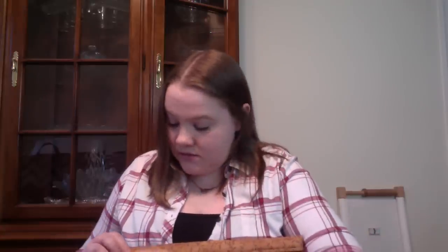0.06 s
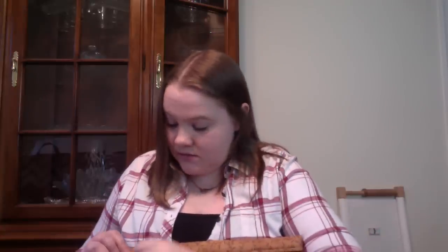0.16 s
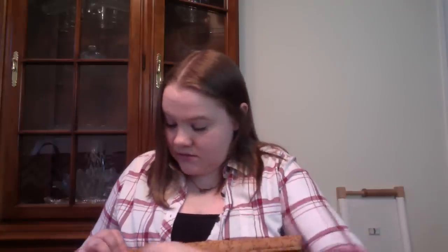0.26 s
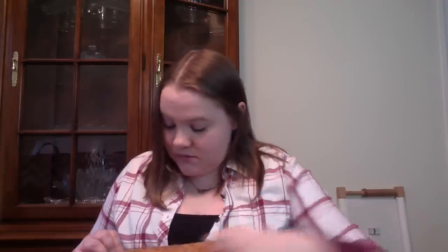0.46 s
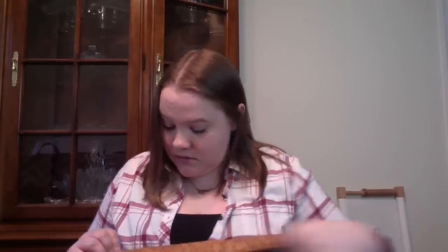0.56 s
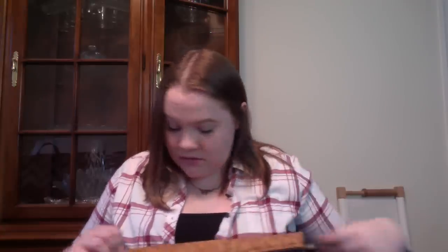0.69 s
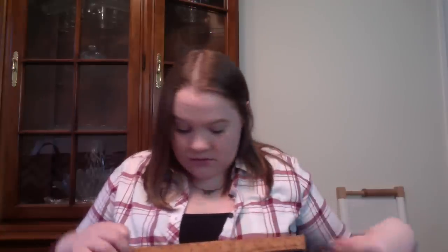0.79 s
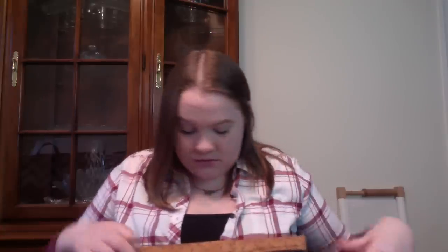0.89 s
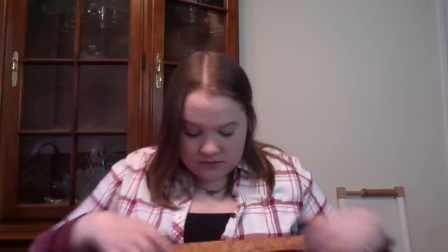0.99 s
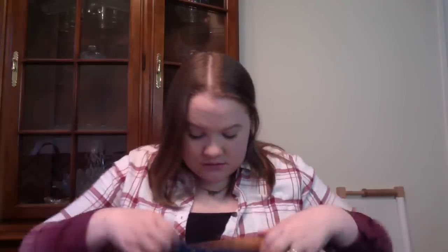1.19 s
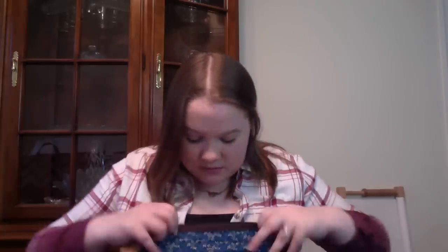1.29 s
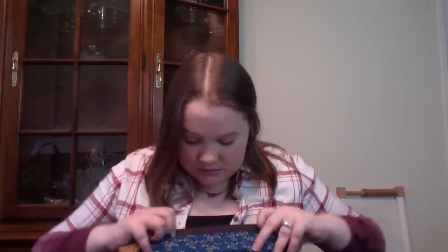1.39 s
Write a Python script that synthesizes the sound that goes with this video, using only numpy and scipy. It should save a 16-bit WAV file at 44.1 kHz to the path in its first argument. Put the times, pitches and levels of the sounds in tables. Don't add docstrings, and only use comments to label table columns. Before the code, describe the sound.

Faint tab clinks, then a single raspy zip that speeds up, brightens and slows to a stop, followed by light metal ticks and fabric rustling; indoors, close small microphone with slightly dull treble and low hiss.

```python
import sys
import numpy as np
from scipy import signal
from scipy.fft import rfft, irfft, next_fast_len
from scipy.io import wavfile
from scipy.ndimage import uniform_filter1d, map_coordinates

SR = 44100
rng = np.random.default_rng(int(sys.argv[2]) if len(sys.argv) > 2 else 0)


def ratio_of_db(decibels):
    return 10 ** (np.asarray(decibels, float) / 20)


def wrap_up_sound(samples):
    columns = np.atleast_2d(samples).T
    tamed = np.clip(columns, -1, 1)
    steps = np.round(tamed * 32767).astype(np.int16)
    wavfile.write(sys.argv[1], SR, steps)


N = 63945
T_S = np.arange(N) / SR


def unit(x):
    return x / np.sqrt(np.mean(x ** 2) + 1e-20)


def along(points, hz):
    point_hz, value = np.transpose(points)
    return np.interp(np.log(hz + 1), np.log(point_hz + 1), value)


def curves(rows):
    time_s, *columns = np.transpose(rows)
    return [np.interp(T_S, time_s, column) for column in columns]


def wobble(rate_hz):
    return map_coordinates(rng.standard_normal(400), [T_S * rate_hz])


def filtered(x, response):
    size = next_fast_len(N + SR // 2)
    spectrum = rfft(x, size) * response(np.fft.rfftfreq(size, 1 / SR))
    return irfft(spectrum, size)[..., :N]


def noise(level_db):
    return unit(filtered(rng.standard_normal(N), lambda hz: ratio_of_db(along(level_db, hz))))


def body(x, peaks, patchy_db=0, speed_db=0):
    steeper_hz = 5900
    center_hz, width_hz, level_db = np.transpose(peaks)[:, :, None]

    def resonances(hz):
        damping = 1j * hz * width_hz
        return ratio_of_db(level_db) * (damping / (center_hz ** 2 - hz ** 2 + damping)) ** 2

    parts = filtered(x, resonances)
    drift = np.array([ratio_of_db(patchy_db * wobble(25.04)) for peak in peaks]) if patchy_db else 1
    moved = parts * drift * ratio_of_db(speed_db * center_hz / steeper_hz)
    return moved.sum(axis=0) / np.std(parts.sum(axis=0))


def impulses(at, size):
    k = np.floor(at)[:, None] + np.arange(-7, 9)
    offset = k - at[:, None]
    taps = size[:, None] * np.sinc(offset) * np.cos(np.pi * offset / 16) ** 2
    return np.bincount(np.clip(k, 0, N).astype(int).ravel(), taps.ravel(), N + 1)[:N]


# hz, level_db
HUM_SPECTRUM = [(18, -56), (30, -40), (59, -47), (86, -7), (146, 2), (178, -4), (289, -3.5), (465, -19),
                (700, -23), (910, -53), (1540, -120)]


def air():
    rumble = noise(HUM_SPECTRUM) * ratio_of_db(-62.5 + 0.5 * wobble(8.1))
    mains = ratio_of_db(-79.5) * np.sin(2 * np.pi * 58 * T_S)
    hiss = ratio_of_db(-71.5) * noise([(300, -120), (500, 7.5), (9000, -12), (15500, 1)])
    return rumble + mains + hiss


# time_s, level_db
HANDLING = [(0, -65.5), (.11, -69.5), (.3, -54.5), (.72, -60.5), (.8, -64), (.95, -64.5), (1.03, -68),
            (1.13, -63.5), (1.17, -66.5), (1.21, -65.5), (1.28, -65), (1.34, -66), (1.45, -67)]
# hz, level_db
RUSTLE_SPECTRUM = [(240, -45), (400, -1), (760, 1.5), (821, -0.5), (1200, 1.5), (2150, -2.5), (4550, -6.5),
                   (8020, -15.5), (15500, -37)]


def cloth():
    strength_db, = curves(HANDLING)
    grains = rng.standard_normal(N) * ratio_of_db(2 * rng.standard_normal(N))
    rub = unit(filtered(grains, lambda hz: ratio_of_db(along(RUSTLE_SPECTRUM, hz))))
    return ratio_of_db(strength_db + 1.66 * wobble(23.05)) * rub


# start_s, peak_db, pitch_hz, own_db (share of that pitch)
TICKS = [(0.1479, -50, 3140, 8), (0.1738, -53, 2950, 20), (0.201, -50.5, 3230, 21), (0.7728, -49, 5150, -4),
         (0.8458, -52.5, 3220, -9), (0.857, -51, 4470, -11), (0.8817, -57.5, 2850, 4),
         (0.9156, -44, 3000, -25), (0.972, -49.5, 2830, -12), (1.033, -56.5, 3070, -7),
         (1.061, -53.5, 7640, 5.5), (1.1227, -54.5, 3850, -5), (1.1416, -49.5, 6500, -7)]
# center_hz, width_hz, level_db
TICK_BODY = [(1280, 450, -3.5), (3040, 1600, 1.5), (3950, 660, -1.5), (5020, 510, -11), (6860, 850, -2.5),
             (9540, 540, -6)]
# start_s, pitch_hz, level_db, t60_s
RINGS = [(.002, 3180, -62.5, 0.27), (0.787, 6810, -74, .5), (.813, 9100, -80, 0.33),
         (.846, 11800, -53.5, 0.039), (0.856, 11450, -60, .035), (0.921, 3260, -63, 0.22),
         (.94, 3130, -63.5, .3), (1.143, 6660, -55, 0.043), (0.984, 442, -63, 0.21),
         (0.673, 5570, -51, .06), (.686, 6630, -59, .12)]


def tab():
    tick_db, tick_t60_s, width_over_pitch = -1, .018, .2
    ring_width_hz, ring_attack_s = 35, 0.00067
    out = np.zeros(2 * N)
    for start_s, peak_db, pitch_hz, own_db in TICKS:
        burst = ratio_of_db(-60 * T_S / tick_t60_s) * rng.standard_normal(N)
        own = body(burst, [(pitch_hz, width_over_pitch * pitch_hz, 0)])
        tick = body(burst, TICK_BODY) + ratio_of_db(own_db) * own
        out[round(start_s * SR):][:N] += ratio_of_db(peak_db + tick_db) * tick / np.abs(tick).max()
    for start_s, pitch_hz, level_db, t60_s in RINGS:
        drift = np.cumsum(rng.standard_normal(N)) * np.sqrt(2 * np.pi * ring_width_hz / SR)
        envelope = ratio_of_db(level_db - 60 * T_S / t60_s) * (1 - np.exp(-T_S / ring_attack_s))
        out[round(start_s * SR):][:N] += envelope * np.sin(2 * np.pi * pitch_hz * T_S + drift)
    return out[:N]


def grit(place, count):
    grains_per_tooth, spread_db, lag_periods, rarest = 8, 3, .6, 0.013
    lag, big, keep, sign = rng.random((4, count, 16))
    kept = keep < grains_per_tooth / lag.shape[1]
    size = kept * np.sign(sign - .5) * ratio_of_db(-spread_db * np.log(np.clip(big, rarest, 1)))
    at = place(np.arange(count)[:, None] - lag_periods * np.log(lag))
    return impulses(at.ravel(), size.ravel())


# time_s, teeth_hz, odd_weaker (0-1), bag_tension_db
STROKE = [
    (.2, 245.2, 1, 0.5),
    (.26, 323.5, 0.93, 2),
    (.3, 407.2, 0.4, 4.5),
    (.34, 514.6, 0.27, -1),
    (.385, 598.9, 0, 0),
    (.46, 702.5, 0.01, 1),
    (.51, 683.2, 0, 4),
    (.565, 556.4, 0, 3),
    (.635, 310, 0.3, 5),
]
# time_s, pull_db, rasp_db (over clean teeth)
FORCE = [
    (.195, -54, -37),
    (.235, -44, -4),
    (.3, -41.5, 0.5),
    (.38, -36.5, -4.5),
    (.42, -42.5, 0.5),
    (.535, -38.5, 1),
    (.6, -45.5, 7),
    (.655, -47.5, 2.5),
    (.695, -81, 11.5),
]
# center_hz, width_hz, level_db
TAPE = [(1230, 560, 1), (1813, 170, 9), (2070, 400, -9.5), (2850, 880, 3.5)]
# center_hz, width_hz, level_db
BAG = [(310, 76, 7.5), (368.5, 70, 0.5), (544, 89, -2), (693.6, 190, -3), (1198, 290, 1.5), (1417, 220, -1),
       (2660, 335, -10)]
# center_hz, width_hz, level_db
SLIDER = [(483, 230, -13.5), (1275, 420, 1.5), (1520, 330, -8), (2950, 500, 0.5), (3430, 1400, -0.5),
          (4610, 370, 0), (6000, 250, -4), (7180, 260, -18), (7720, 200, -11), (8820, 240, -28)]
# center_hz, width_hz, level_db
FAR_END = [(450, 860, -13), (1404, 530, 0), (2000, 167, 2), (2684, 370, 4), (3970, 670, 1),
           (4940, 250, -1.5), (6680, 200, -22), (7760, 2000, -35)]
# center_hz, width_hz, level_db
FAST = [(3630, 580, 1), (4405, 1020, 0.5), (5210, 1150, 0.5), (6160, 2570, 0.5), (8160, 1800, -11.5),
        (9100, 270, -7), (11000, 3400, -6), (13200, 2600, -30), (14400, 1300, -24)]


def zipper():
    jitter_periods, bag_jitter_periods, slow_power, size_db = 0.036, 0.028, 2.8, 2
    tape_db, bag_db, slider_db, fast_db, fast_db_per_octave = -10.5, -6.5, -5, -6, 12
    patchy_db, bumps_db, heat_lag_s, cross_s, cross_width_s = 2.5, 0.03, 0.02, 0.449, 0.037
    rate_hz, odd_weaker, tension_db = curves(STROKE)
    force_db, rasp_db = curves(FORCE)
    moving = uniform_filter1d(1. * (T_S > FORCE[0][0]) * (T_S < FORCE[-1][0]), size=500)

    turns, tooth = np.cumsum(rate_hz) / SR, np.arange(800)

    def place(count):
        return np.interp(count, turns, np.arange(N))

    at = place(tooth).astype(int)
    draw = rng.standard_normal((len(tooth), 2))
    size = 1 + np.clip(odd_weaker[at], 0, 1) * (-1.) ** tooth
    slow = (rate_hz.max() / rate_hz[at]) ** slow_power
    teeth = impulses(place(tooth + jitter_periods * slow * draw[:, 0]), ratio_of_db(size_db * draw[:, 1]) * size)
    even = impulses(place(tooth + bag_jitter_periods * draw[:, 0]), size)

    speed_db = fast_db_per_octave * np.log2(np.interp(T_S - heat_lag_s, T_S, rate_hz) / rate_hz.max())
    far = .5 + .5 * np.tanh((T_S - cross_s) / cross_width_s)
    scrape = grit(place, len(tooth))
    slider = np.sqrt(1 - far) * body(scrape, SLIDER, patchy_db)
    slider += np.sqrt(far) * body(scrape, FAR_END, patchy_db)

    slider_bumps, fast_bumps, tape_bumps = [ratio_of_db(bumps_db * wobble(27.1)) for layer in range(3)]
    fast = body(grit(place, len(tooth)), FAST, patchy_db, speed_db)
    rasp = ratio_of_db(slider_db) * slider_bumps * slider + ratio_of_db(fast_db) * fast_bumps * fast
    tape = ratio_of_db(tape_db) * tape_bumps * body(teeth, TAPE)
    bag = ratio_of_db(bag_db + tension_db) * body(even, BAG, patchy_db=3.5)
    return moving * ratio_of_db(force_db) * (tape + bag + ratio_of_db(rasp_db) * rasp)


# hz, t60_s
ROOM_DECAY = [(250, 0.62), (1500, 0.12), (5000, 0.25), (12000, 0.12)]


def room(x):
    hz, time_s, z = signal.stft(rng.standard_normal(SR // 2), SR, nperseg=256)
    decay = ratio_of_db(-60 * time_s / along(ROOM_DECAY, hz)[:, None])
    tail = signal.istft(z * decay, SR, nperseg=256)[1]
    return signal.fftconvolve(np.pad(x, (150, 0)), tail / np.linalg.norm(tail))[:N]


def scene():
    room_db, tab_room_db = -11, -8
    zip_, ticks = zipper(), tab()
    echo = ratio_of_db(room_db) * room(zip_ + ratio_of_db(tab_room_db) * ticks)
    return (zip_ + ticks + echo + cloth() + air())[None]


def top_cut(x):
    return signal.sosfilt(signal.butter(12, 15630, fs=SR, output="sos"), x)


# hz, level_db
MIC = [(30, -20), (55, -1), (9000, 0), (12000, -9.5), (15500, -16.5)]


def record(dry):
    heard = filtered(dry, lambda hz: ratio_of_db(along(MIC, hz)) * (hz < 15650))
    return top_cut(heard)


dry = scene()
out = record(dry)
wrap_up_sound(out)
```